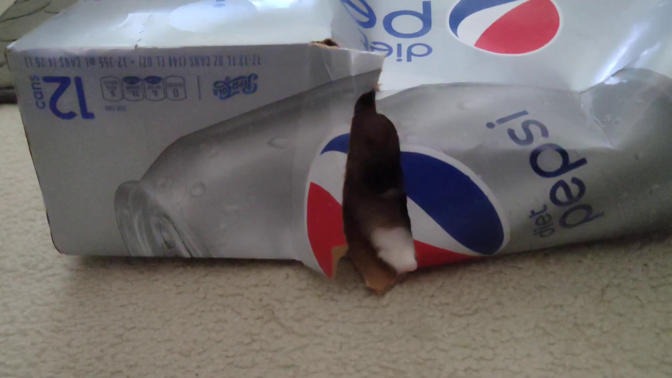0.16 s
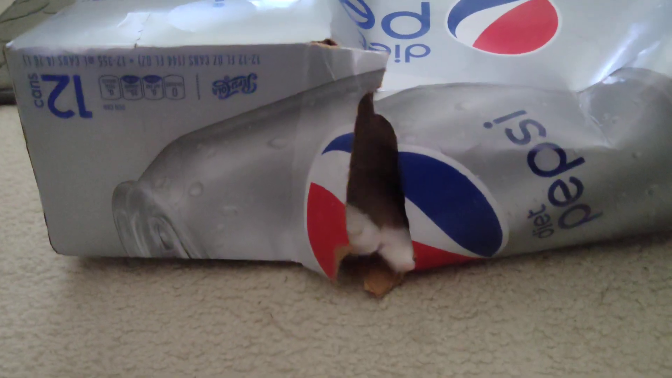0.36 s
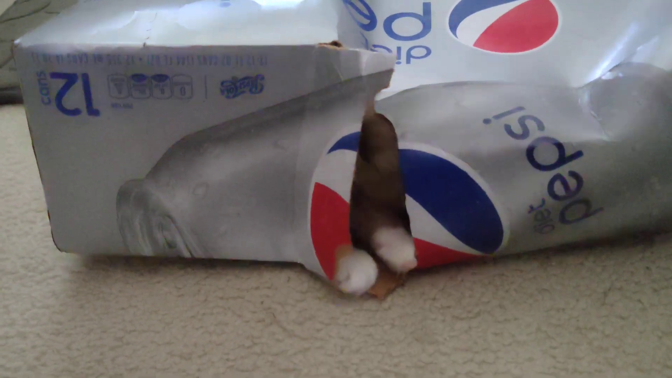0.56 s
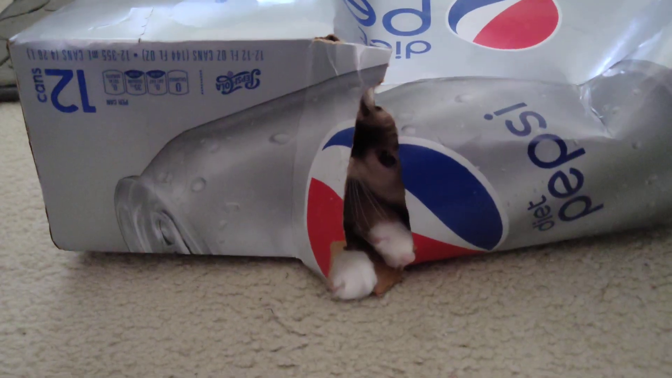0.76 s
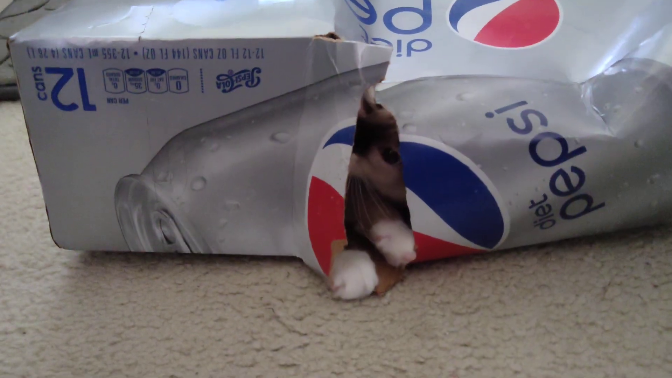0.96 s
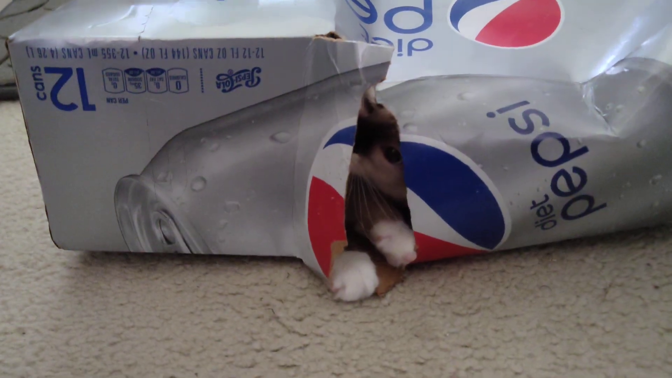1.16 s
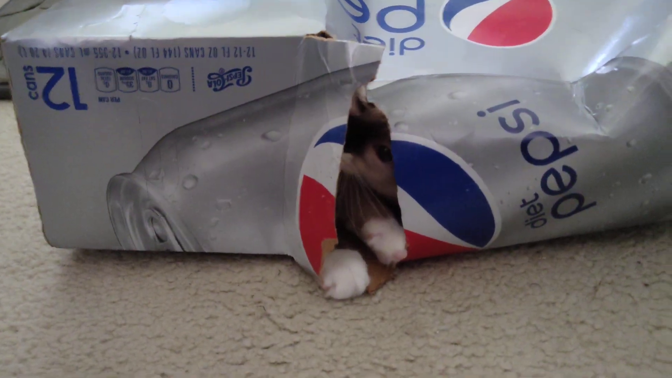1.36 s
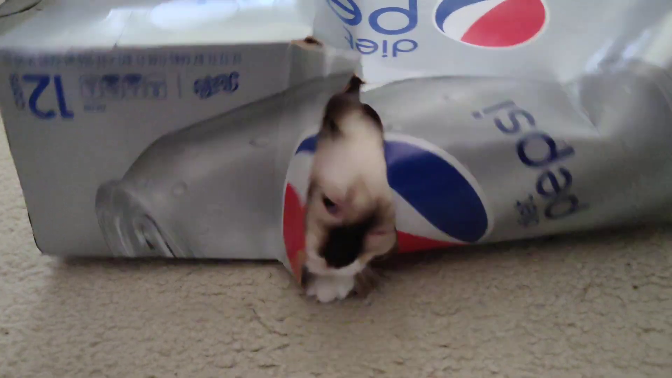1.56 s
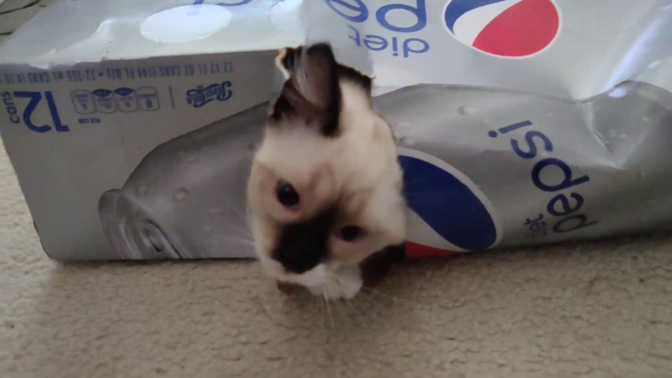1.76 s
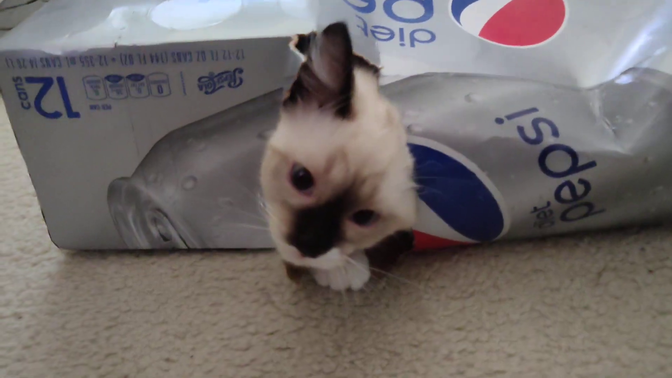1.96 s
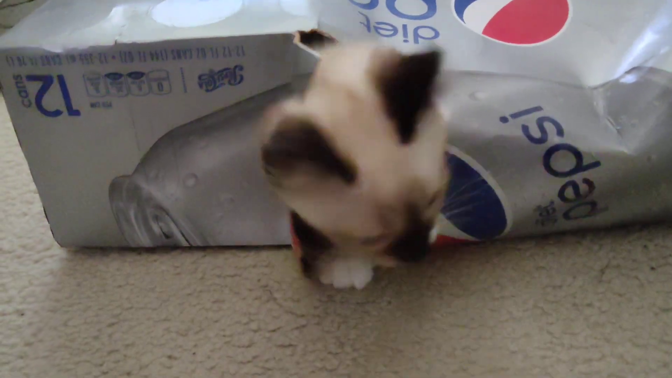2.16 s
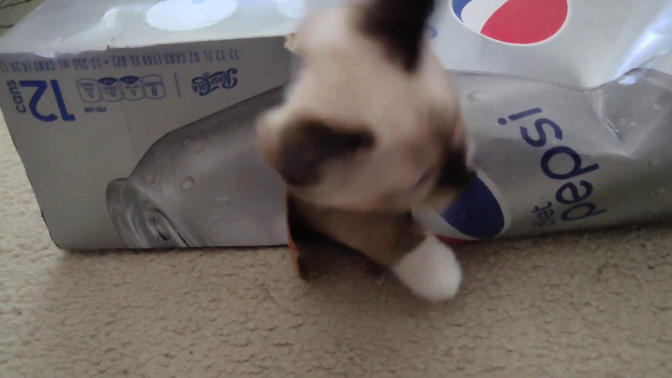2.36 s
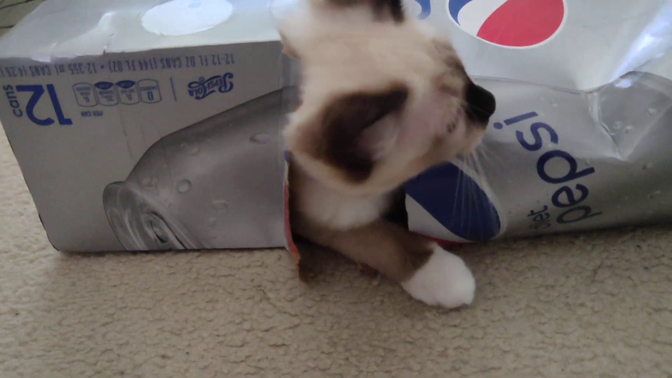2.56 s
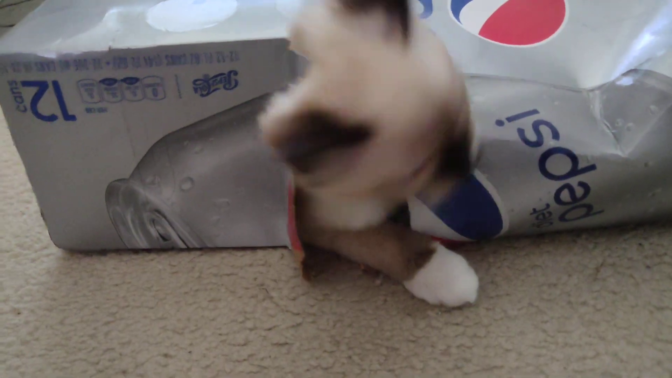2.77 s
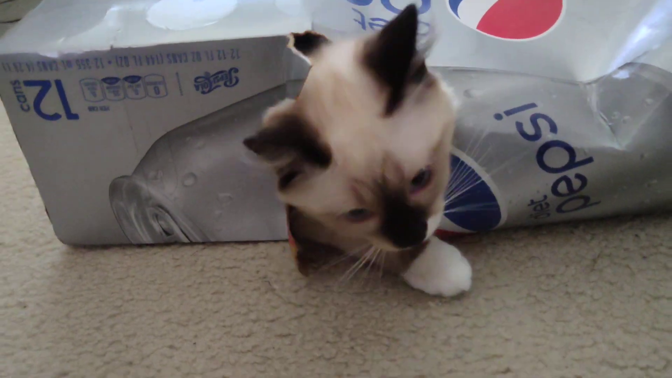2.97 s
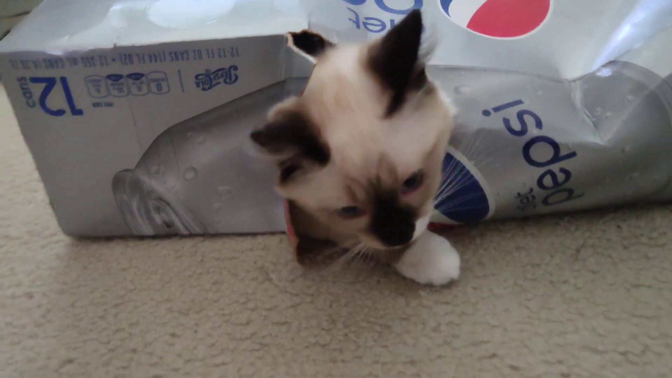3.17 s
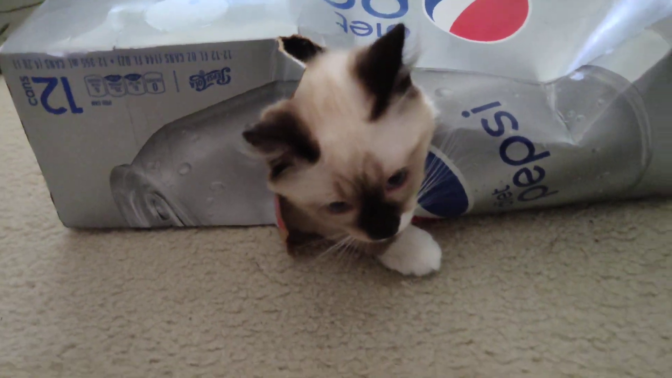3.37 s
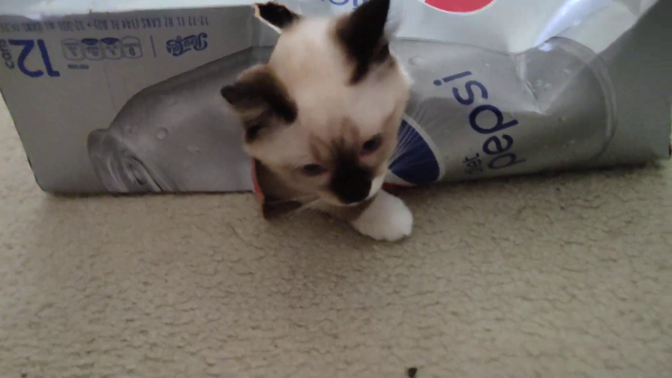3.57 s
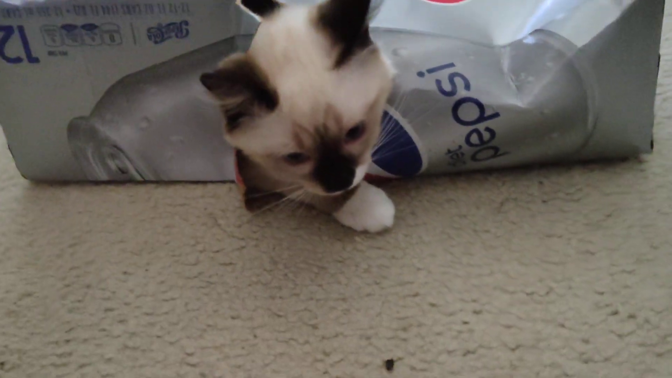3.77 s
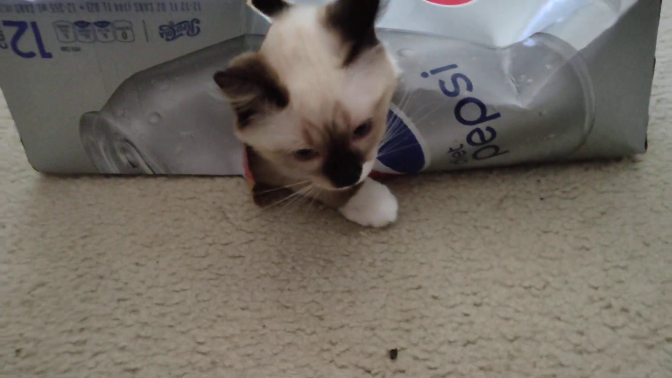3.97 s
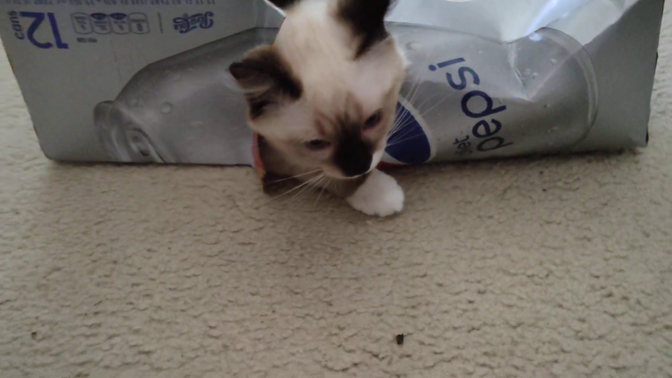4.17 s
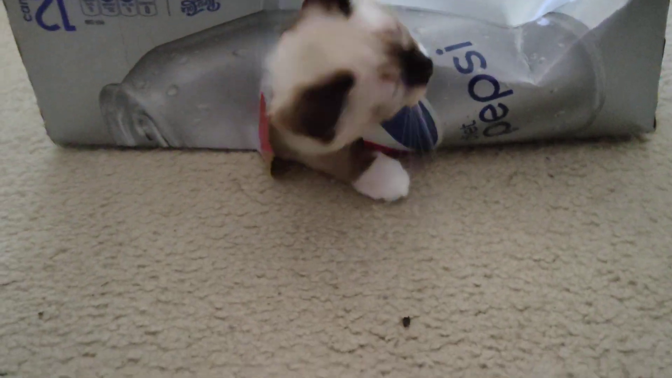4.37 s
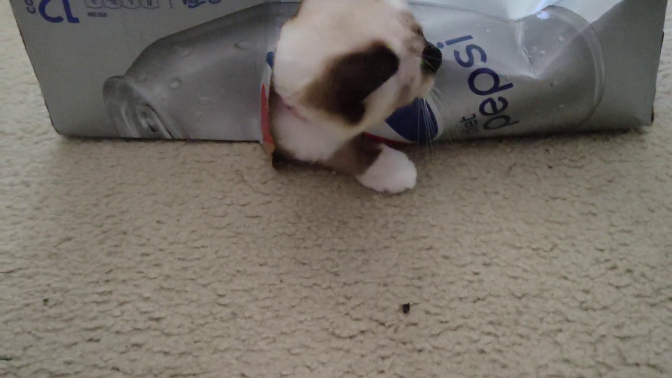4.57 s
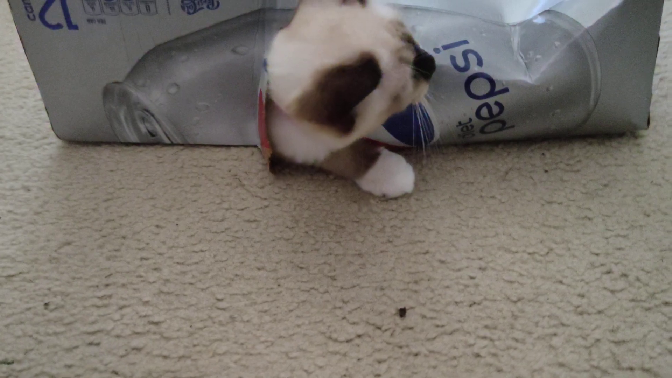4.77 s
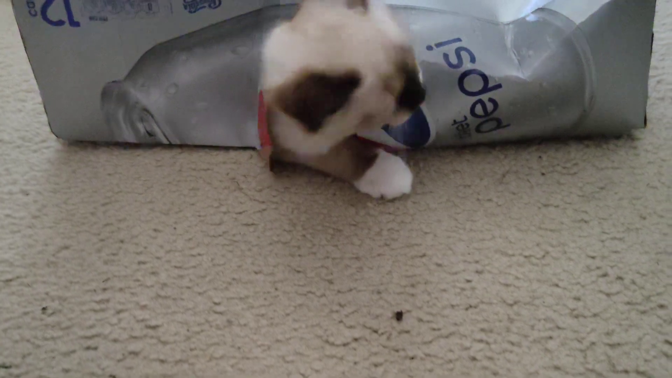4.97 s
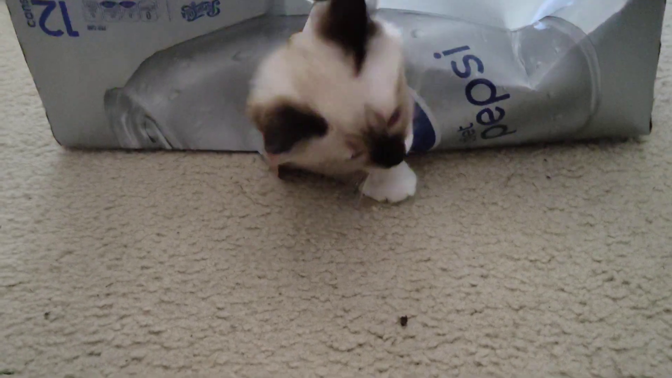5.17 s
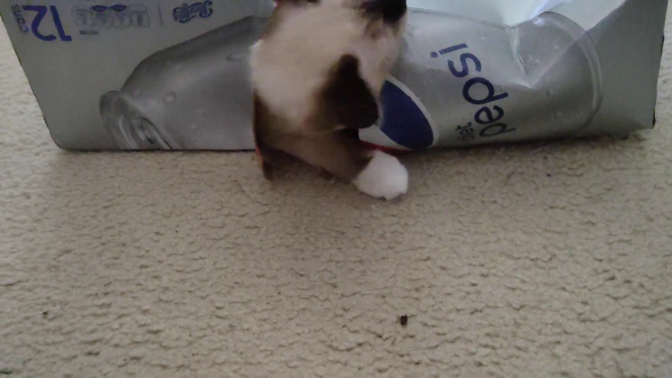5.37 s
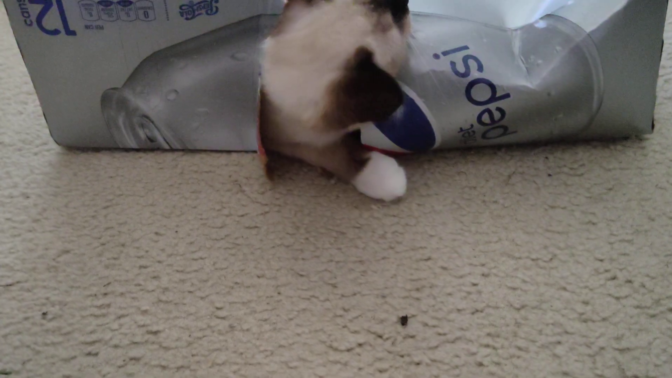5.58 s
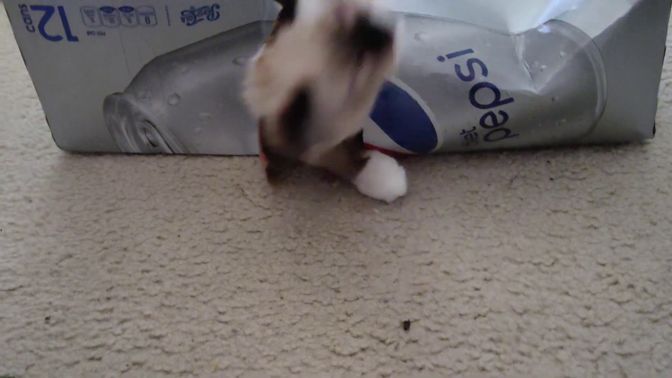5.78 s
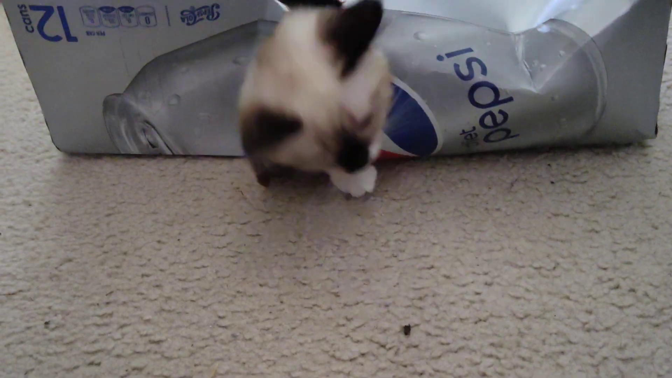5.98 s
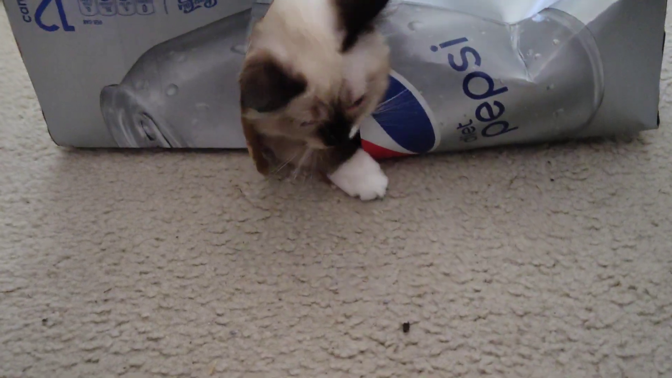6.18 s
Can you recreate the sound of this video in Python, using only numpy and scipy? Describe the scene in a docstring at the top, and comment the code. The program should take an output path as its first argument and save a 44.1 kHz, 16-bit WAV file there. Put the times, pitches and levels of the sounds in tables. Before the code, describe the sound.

A kitten claws at a thin cardboard box in bouts of scratchy rustling, sharp clicks and soft hollow thuds, over a faint hum.

```python
"""Kitten squeezing through a cardboard box

A kitten pushes through a torn slit in a thin box on a carpet, close to a phone with two microphones.
Claws catch and drag on the board, paws swipe the wall, fur rubs the torn edge, the hollow box thuds.
A small soft room answers, over the hum of an appliance."""
import sys
import numpy as np
from scipy import signal
from scipy.fft import rfft, irfft
from scipy.io import wavfile
from scipy.ndimage import uniform_filter1d

SR = 44100
rng = np.random.default_rng(int(sys.argv[2]) if len(sys.argv) > 2 else 0)


def output_pcm(signal):
    """Save a mono or channel-first signal as 16-bit PCM at the path in sys.argv[1].

    Samples are clipped to [-1, 1] before scaling.
    """
    pcm = np.clip(np.atleast_2d(signal).T, -1, 1) * 32767
    wavfile.write(sys.argv[1], SR, np.round(pcm).astype(np.int16))


N = 275184

# Claw catches: start_s, scrape_db, board_re_scrape_db, edge_re_scrape_db, drag_ms, skid_re_snap_db
CLAWS = [(0.551, -45, -32, -25, 5.5, -7), (0.637, -34.5, -24, -13, 37, -22.5),
         (0.823, -34, -40, -8, 50, -17), (0.882, -34.5, -48, -6.5, 46, 0), (0.9942, -36, -40, -8, 97, 4),
         (1.0572, -36, -24, -18, 20, -1), (1.1218, -14.5, -28.5, -15, 13, -3),
         (1.1283, -14, -34, -25, 9.6, 3), (1.1409, -16.5, -38, -22, 29.6, -8.5),
         (1.204, -25, -25, -10, 6.5, -15), (1.241, -36, -28, -14, 6, -16),
         (1.2645, -27.5, -12.5, -41, 11, -13), (1.273, -19, -23, -58, 9.8, -11.5),
         (1.289, -22.5, -24, -61, 10, 9), (1.356, -36, -7, -48, 16, 1), (1.392, -22.5, -27, -15, 12, -13),
         (1.412, -31.5, -9, -34, 27, -11), (1.4315, -20.5, -18, -3.5, 24, -8),
         (1.4451, -14, -25, -10, 9.6, -19), (1.4718, -18.5, -11, -14, 8.1, -2),
         (1.526, -22, -11, -44, 20, -15), (1.581, -20.5, -14.5, -17.5, 5, -13),
         (1.6245, -34, -0.5, -30, 23, -20.5), (1.652, -33, -37, -11, 22, -4),
         (1.6915, -19, -17, -11, 27, 3), (1.6976, -14, -26, -6.5, 13, 8), (1.7089, -18, -16, -26, 8.6, -7),
         (1.7389, -18.5, -14, -31, 7.5, -10), (1.7641, -22.5, -6, -14, 33, -3),
         (1.771, -20, -16, -7, 8.1, -4), (1.7781, -12, -10.5, -16, 19, -19),
         (1.7881, -4, -13, -10, 4.4, -0.5), (1.7993, -16, -5, -26, 11, -10.5),
         (1.809, -14.5, -10, -25, 11.5, -10), (1.888, -20.5, -29, -16, 8.6, -1),
         (1.9151, -15, -26, -15, 8.1, -17), (2.031, -20, -34, -7, 27, -4),
         (2.1074, -22, -9.5, -33, 37, -14.5), (2.117, -9, -26, -20.5, 7.2, -30),
         (2.126, -21.5, -17, -20, 8.8, -13), (2.2046, -28, -15, -34, 11, -18),
         (2.2538, -28.5, -45, -7.5, 55, 0), (2.389, -31, -17, -5.5, 23, -5),
         (2.4595, -20.5, -18.5, -4.5, 43, -11), (2.5858, -29, -25, -6.5, 8.1, -20),
         (2.6198, -27, -29, -23, 6.8, -8), (2.6914, -30.5, -52, -10, 21, -7),
         (2.7191, -31.5, -44, -5, 43, -10), (2.7401, -27.5, -43, -8.5, 32, -14),
         (2.879, -30, -19, -12, 39, -1), (2.9026, -26.5, -49, -10.5, 16, -16),
         (3.178, -35.5, -37, -8, 9.7, -17), (3.223, -46, -37, -7, 6, -20), (3.281, -42, -28, -11, 24, -19),
         (3.4326, -32.5, -24, -11.5, 60, -24.5), (3.716, -30.5, -40, -6, 44, -25),
         (3.742, -44, -28, -13, 12, -19), (3.818, -30, -37, -5.5, 15, -14),
         (3.9681, -37.5, -23, -6, 34, -16.5), (4.029, -49, -23, -15, 6, -8),
         (4.0575, -39.5, -18, -44, 22, -4), (4.3544, -33, -25, -7.5, 18, -9),
         (4.607, -35.5, -22, -34, 4.1, -18), (4.6568, -15, -36, -14, 29, -31),
         (4.741, -35.5, -30, -14, 5.2, -9), (4.787, -50, -2, -28, 4, -13), (4.808, -42, -25, -1, 8, -9),
         (4.8213, -23.5, -53, -5, 10, -12), (4.9478, -22, -33, -11, 5.6, -12),
         (4.9574, -20, -23, -16, 4.3, -1), (4.973, -13.5, -15, -19.5, 14.7, -15),
         (5.0461, -26, -6, -26, 9.8, 4), (5.0497, -21.5, -20, -24, 9.5, -14),
         (5.0707, -13.5, -11.5, -17, 15, -12.5), (5.2797, -10, -46, -14.5, 3.5, -25),
         (5.2809, -8, -25, -22, 4.7, -11), (5.2827, -16, -22, -21, 14, -18),
         (5.2981, -27, -3, -22, 14, -15), (5.3806, -19, -46, -6, 7.2, -21), (5.39, -24.5, -40, -7, 15, -12),
         (5.3996, -27.5, -33, -15, 110, -15.5), (5.593, -13.5, -40, -17.5, 8, -15),
         (5.603, -19.5, -23, -15, 27, -7), (6.198, -26, -47, -9, 6, -10)]
FLAP_HZ, FLAP_SPREAD = 4860, 0.022


def claws(scrape_port, edge_port):
    """Each tip snaps free, then skids in slips of falling force; it is too small to move the low modes."""
    out = np.zeros((2, N + SR))
    t = np.arange(SR // 6) / SR
    for start_s, db, board_db, edge_db, drag_ms, skid_db in CLAWS:
        drag = (1 - np.exp(-t / 0.00019)) * np.exp(-1000 * t / drag_ms)
        skid = drag * grit(len(t), per_s=2700, spread_db=1.46)
        snap = (1 - np.exp(-t / 0.00011)) * np.exp(-t / 0.00059) * rng.choice([-1, 1], len(t))
        force = through(snap + undb(skid_db) * skid, reflections())[:, :len(t)]
        pitch_hz = FLAP_HZ * (1 + FLAP_SPREAD * rng.standard_normal())
        scrape = filter_to_peak(flap(force, pitch_hz), scrape_port, db)
        board = filter_to_peak(force, board_ring(damp_per_s=450, low_hz=876), db + board_db)
        edge = filter_to_peak(force, edge_port, db + edge_db)
        add_at(out, start_s, scrape + board + edge)
    return out[:, :N]


# Strokes along the wall: start_s, length_s, scrape_db, board_re_scrape_db, pitch_hz
SWIPES = [(0.063, 0.094, -28.5, -36, 4730), (0.143, 0.22, -34, -32, 4740), (0.209, 0.098, -29, -41, 4870),
          (0.323, 0.041, -38, -14, 5200), (0.45, 0.073, -40.5, -31, 4800), (1.534, 0.077, -24, -17, 4200),
          (1.848, 0.046, -21.5, -6.5, 5200), (2.015, 0.047, -22, -33, 4840),
          (2.286, 0.054, -25.5, -30, 5100), (2.505, 0.079, -39.5, 2.5, 4930),
          (2.921, 0.087, -33, -24, 4670), (1.07, 0.068, -42, -30, 5050), (2.612, 0.04, -31, -25, 4550),
          (3.009, 0.067, -26.5, -11.5, 4480), (3.332, 0.082, -52, -17, 5000),
          (4.482, 0.059, -42, -22, 4860), (3.925, 0.046, -43, -14.5, 4900),
          (3.79, 0.11, -33.5, -13.5, 4940)]


def swipes(scrape_port):
    """Paws and ears brush the wall in gritty strokes, too light to move the low modes."""
    out = np.zeros((2, N + SR))
    t = np.arange(SR // 6) / SR
    for start_s, length_s, db, board_db, pitch_hz in SWIPES:
        swell = np.sin(np.pi * np.clip(t / length_s, 0, 1)) ** 1.04
        stroke = swell * grit(len(t), per_s=4000, spread_db=2)
        force = through(stroke, reflections())[:, :len(t)]
        scrape = filter_to_peak(flap(force, pitch_hz), scrape_port, db)
        board = filter_to_peak(force, board_ring(damp_per_s=700, low_hz=1010), db + board_db)
        add_at(out, start_s, scrape + board)
    return out[:, :N]


def flap(force, pitch_hz):
    """The scored flap sings at its own pitch."""
    return 0.1 * force + 5.4 * signal.lfilter(*signal.iirpeak(pitch_hz, Q=1.8, fs=SR), force)


# Fur and paws rubbing: time_s, gain_db
RUB = [(0.0, -51), (0.15, -38.5), (0.45, -54.5), (0.78, -47), (1.09, -56), (1.14, -39), (1.36, -60),
       (1.44, -49), (1.66, -39.5), (1.76, -33.5), (1.8, -22), (1.85, -32), (1.89, -34), (2.01, -49),
       (2.04, -42.5), (2.21, -45.5), (2.28, -39.5), (2.45, -41.5), (2.47, -38.5), (2.62, -35.5),
       (2.66, -50), (2.73, -51), (2.87, -60), (2.89, -81), (2.98, -38.5), (3.16, -53), (3.45, -54.5),
       (3.68, -61), (4.29, -57.5), (4.64, -46.5), (4.73, -46), (4.78, -57.5), (4.93, -54.5), (5.27, -39),
       (5.37, -43.5), (5.44, -44), (5.58, -47.5), (5.7, -45.5), (5.91, -54), (6.0, -40), (6.24, -45.5)]
# Fur hissing on the torn edge: time_s, gain_db
EDGE_HISS = [(0, -62), (.1, -52), (.2, -58.5), (.38, -66.5), (.76, -63), (.97, -68), (1.01, -57),
             (1.1, -56), (1.19, -46), (1.25, -59), (1.32, -78), (1.45, -76), (1.63, -68), (1.72, -48),
             (1.76, -56), (1.82, -36), (1.9, -47), (1.98, -66), (2.1, -71), (2.3, -50.5), (2.5, -64),
             (2.6, -56), (2.68, -76), (2.88, -75), (3.03, -54), (3.15, -66), (3.32, -70), (4.36, -68.5),
             (4.6, -65), (4.78, -80), (4.93, -72), (5.02, -58), (5.15, -73), (5.54, -63), (5.85, -70),
             (6.0, -57.5), (6.24, -65)]


def fur(scrape_port, edge_port):
    """Dense rubbing wanders over five spots of the torn edge; the board creaks after bumps."""
    force, board = 0, 0
    for _ in range(5):
        slips = undb(3.6 * wander(15.6) - 11.5) * grit(N, per_s=4500, spread_db=2.5)
        spot = through(slips, reflections())
        force = force + spot
        board = board + through(spot + 0.88 * slips, board_ring(damp_per_s=320, low_hz=430))
    bump_s, bump_db = np.transpose(BUMPS)[:2]
    claw_s, claw_db, _, treble_db = np.transpose(CLAWS)[:4]
    rub_gain = curve(RUB)
    creak_gain = np.hypot(undb(-16) * rub_gain, fading(bump_s, bump_db - 12.5, fade_s=0.02))
    # a brief high hiss fades after each claw catch
    hiss_gain = np.hypot(curve(EDGE_HISS), fading(claw_s, claw_db + treble_db - 11.5, fade_s=0.022))
    scrape = 1.36 * through(rub_gain * force, scrape_port)
    creak = creak_gain * board * undb([[1.5], [-1.5]])
    hiss = 2.43 * through(hiss_gain * force, edge_port)
    return scrape + creak + hiss


def grit(size, per_s, spread_db):
    """Fibres letting go: random slips of unequal size, rms near 1."""
    slipping = rng.random(size) < per_s / SR
    slips = slipping * rng.standard_normal(size)
    slips *= undb(spread_db * np.minimum(rng.exponential(size=size), 3))
    return slips / np.sqrt(np.mean(slips ** 2) + 1e-12)


# Box modes: pitch_hz, level_db, t60_s
BOX_MODES = [(54.5, -22, 0.25), (86, -13, 0.26), (113.7, 6, 0.3), (136.2, 2, 0.43), (189, 5, 0.2),
             (258, -3.5, 0.15), (413, 4, 0.068), (610, 10, 0.011), (1060, -5.5, 0.031), (1294, -2, 0.023),
             (1836, -7.5, 0.025), (2410, -19, 0.094), (2430, -1, 0.0034)]


def box_ring(tilt, length_s, detune=0, pitch_ratio=1):
    """The box's modes after a tap; tilt favours the high ones, a bent wall detunes them."""
    t = np.arange(int(length_s * SR)) / SR
    bends = pitch_ratio + detune * rng.standard_normal(len(BOX_MODES))
    return sum(undb(db) * hz ** tilt * np.sin(2 * np.pi * hz * bend * t) * 1000 ** (-t / t60_s)
               for (hz, db, t60_s), bend in zip(BOX_MODES, bends))


def board_ring(damp_per_s, low_hz):
    """The upper modes that a scratch reaches, damped by the body pressing on the wall."""
    ring = box_ring(tilt=1, length_s=0.05, detune=0.14)
    return unit(band(damped(ring, damp_per_s), low_hz, 4950))


# Body against the walls: start_s, level_db, contact_s, pitch_ratio
BUMPS = [(1.409, -34, 0.004, 1.08), (1.491, -33, 0.0057, 0.96), (1.739, -32, 0.00043, 0.97),
         (1.789, -19.5, 0.0051, .9), (1.824, -29.5, 0.004, 1.1), (2.115, -30.5, 0.0015, 1.01),
         (2.151, -35.5, 0.0047, 0.95), (2.192, -31, 0.0034, 1.05), (2.226, -38, 0.0017, 1.05),
         (4.662, -36, 0.0155, 0.93), (4.974, -46, 0.0043, 1.1), (5.05, -34.5, 0.0053, 1.05),
         (5.083, -24.5, 0.0038, 1.06), (5.12, -37, 0.006, 0.81)]
# Light paw taps: start_s, level_db
TAPS = [(6.159, -38.5), (6.1679, -31.5)]


def thuds():
    """Soft pushes ring the whole hollow box; taps briefly ring its middle modes."""
    out = np.zeros(N + SR)
    for start_s, db, contact_s, pitch_ratio in BUMPS:
        push = np.hanning(int(contact_s * SR) + 3)
        knock = signal.fftconvolve(push, box_ring(tilt=0, length_s=0.2, pitch_ratio=pitch_ratio))
        add_at(out, start_s, undb(db) * knock / np.abs(knock).max())
    for start_s, db in TAPS:
        ring = band(box_ring(tilt=0.3, length_s=0.03), 450, 1500, order=2)
        knock = damped(ring, per_s=300)
        add_at(out, start_s, undb(db) * knock / np.abs(knock).max())
    return out[:N]


# Box stirring under the kitten's weight: time_s, gain_db
WEIGHT = [(0, -70), (.15, -60), (1.3, -70.5), (1.44, -49), (1.55, -59), (1.62, -55), (1.85, -59),
          (1.93, -55), (1.99, -65), (2.1, -55), (2.18, -42.5), (2.25, -53.5), (2.35, -52), (2.42, -69),
          (2.5, -68), (3.02, -58.5), (3.2, -64.5), (4.9, -63), (5.3, -55.5), (5.75, -59), (5.9, -62),
          (6.24, -61.5)]


def rocking():
    """Weight, rubbing and bumps rock the box on the carpet: a low rumble."""
    bump_s, bump_db = np.transpose(BUMPS)[:2]
    after_bumps = fading(bump_s, bump_db - 16, fade_s=0.046)
    sway = curve(WEIGHT) + np.hypot(undb(-22) * curve(RUB), after_bumps)
    noise = band(rng.standard_normal((3, N)), 15, 174, order=2)
    rumble = sway * noise / noise.std()
    return rumble[0] + 0.3 * rumble[1:]


# Scratch colour behind each microphone port: frequency_hz, gain_db
LEFT_PORT = [(300, -22), (1000, -21), (2200, -19), (3300, -13), (4000, -7), (4700, -3), (5500, -8),
             (6700, -12), (7600, -19), (9000, -29), (11300, -43), (13000, -47), (15000, -56)]
RIGHT_PORT = [(300, -36), (1000, -24.5), (2200, -24), (3300, -24), (4000, -25.5), (4700, -22), (5500, -23),
              (6700, -12.5), (7600, -18.5), (9000, -30), (11300, -37.5), (13000, -37.5), (15000, -48.5)]


def ports():
    """Stereo port responses in the scrape band and in the edge-hiss band."""
    pair = np.array([minimum_phase(LEFT_PORT), minimum_phase(RIGHT_PORT)])
    return unit(band(pair, 1790, 6180)), unit(band(pair, 8360, 22000))


def reflections(decay_s=0.0011):
    """From one spot on the box each microphone hears its own short cluster of reflections."""
    paths = rng.standard_normal((2, 256)) * np.exp(-np.arange(256) / SR / decay_s)
    return paths / np.linalg.norm(paths, axis=1, keepdims=True)


def room(near, t60_s=0.36, tail_db=-7, alike_hz=700):
    """The soft room adds a short tail; long waves reach both ports nearly alike."""
    t = np.arange(int(0.45 * SR)) / SR
    tail = rng.standard_normal((2, len(t))) * 1000 ** (-t / t60_s) * (t > 0.005)
    heard = near + undb(tail_db) * through(near, unit(tail))
    side = heard - heard.mean(axis=0)
    return heard - 0.55 * signal.lfilter(*signal.butter(1, alike_hz, fs=SR), side)


# Appliance tones: pitch_hz, rms_db
HUM = [(118.4, -57), (177.6, -71.5), (269.2, -76), (532.9, -78.5)]


def appliance():
    """A hum whose tones waver in level and phase."""
    t = np.arange(N) / SR
    return sum(np.sqrt(2) * undb(db + 0.31 * wander(14)) * np.sin(2 * np.pi * hz * t + 0.62 * wander(9.6))
               for hz, db in HUM)


# Background noise spectrum: frequency_hz, relative_density_db
AIR = [(20, 13.5), (60, -11), (120, -4.5), (200, -11), (400, -10), (800, -20), (1400, -25.5), (3000, -28),
       (8000, -37), (15500, -29)]


def air(rms_db=-55.5):
    """Distant rumble, partly shared by the ports, and each microphone's own hiss."""
    hz = np.fft.rfftfreq(N, 1 / SR)
    mid, side = rfft(rng.standard_normal((2, N))) * np.exp(log_gain(AIR, N))
    side *= np.clip(0.75 + hz / 1800, 0, 1)
    noise = irfft([mid + side, mid - side], N)
    return undb(rms_db) * noise / noise.std()


def undb(db):
    return 10 ** (np.asarray(db) / 20)


def unit(x):
    """Scale to energy 1."""
    return x / np.sqrt(np.sum(x ** 2))


def add_at(out, start_s, sound):
    start = int(start_s * SR)
    out[..., start:start + sound.shape[-1]] += sound


def damped(x, per_s):
    return x * np.exp(-per_s * np.arange(len(x)) / SR)


def band(x, low_hz, high_hz, order=3):
    return signal.sosfilt(signal.butter(order, [low_hz, high_hz], "band", fs=SR, output="sos"), x)


def through(x, response):
    return signal.fftconvolve(np.atleast_2d(x), np.atleast_2d(response), axes=1)[:, :N]


def filter_to_peak(x, response, peak_db):
    """Filter, then scale so that the stereo centre peaks at peak_db."""
    filtered = through(x, response)[:, :x.shape[1]]
    return filtered * undb(peak_db) / np.abs(filtered.mean(axis=0)).max()


def log_gain(table, size):
    """Log gain of (Hz, dB) points on the bins of a transform."""
    hz, db = np.transpose(table)
    return np.interp(np.log(np.fft.rfftfreq(size, 1 / SR) + 1), np.log(hz), db) * np.log(10) / 20


def minimum_phase(table, size=1024):
    """Causal impulse response of (Hz, dB) points."""
    cepstrum = irfft(log_gain(table, size))
    cepstrum[1:size // 2] *= 2
    cepstrum[size // 2 + 1:] = 0
    return irfft(np.exp(rfft(cepstrum)))[:size // 2]


def wander(rate_hz):
    """Smooth random drift, spread 1."""
    width = int(SR / rate_hz)
    drift = uniform_filter1d(uniform_filter1d(rng.standard_normal(N), width), width)
    return drift / drift.std()


def curve(table):
    """Gain along (s, dB) points."""
    return undb(np.interp(np.arange(N) / SR, *np.transpose(table)))


def fading(times_s, db, fade_s):
    """Gain that jumps up at each event and dies away; powers add."""
    kicks = np.zeros(N)
    np.add.at(kicks, (times_s * SR).astype(int), undb(db) ** 2)
    return np.sqrt(signal.lfilter([1], [1, -np.exp(-2 / SR / fade_s)], kicks))


def scene():
    scrape_port, edge_port = ports()
    scratches = room(claws(scrape_port, edge_port) + swipes(scrape_port) + fur(scrape_port, edge_port))
    box = band(thuds() + rocking(), 42, 3000, order=2)
    return scratches + box + appliance() + air()


def record(dry):
    """The phone rounds only the loudest snaps and cuts the top."""
    ceiling, top_hz = 0.97, 15800
    rounded = dry / (1 + (dry / ceiling) ** 4) ** (1 / 4)
    return signal.sosfilt(signal.ellip(10, 0.2, 100, top_hz, fs=SR, output="sos"), rounded)


dry = scene()
out = record(dry)
output_pcm(out)
```